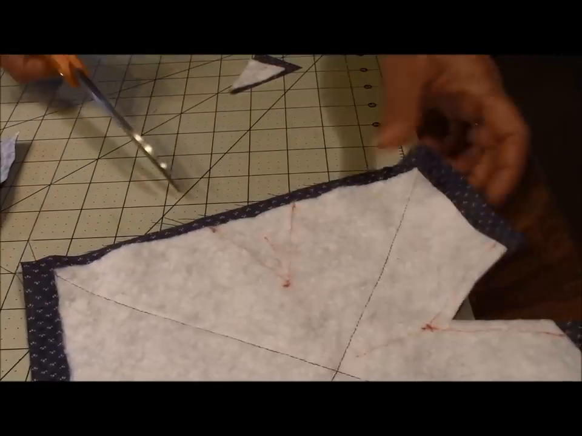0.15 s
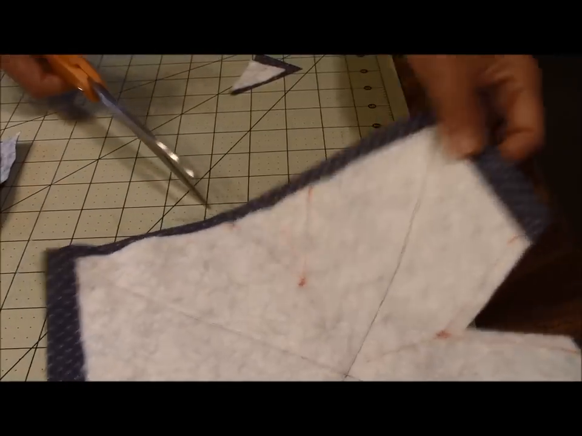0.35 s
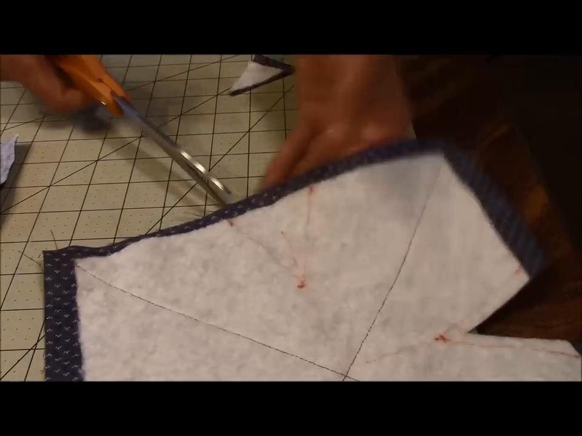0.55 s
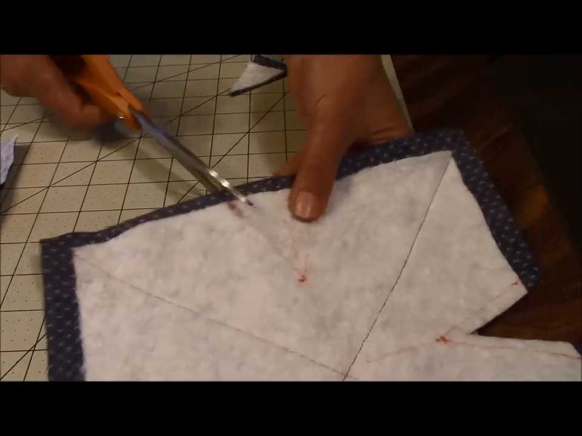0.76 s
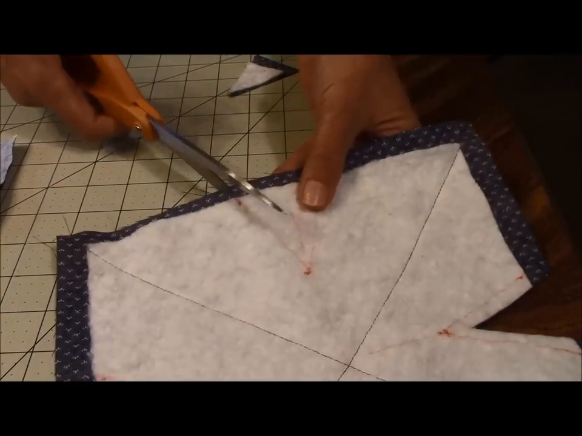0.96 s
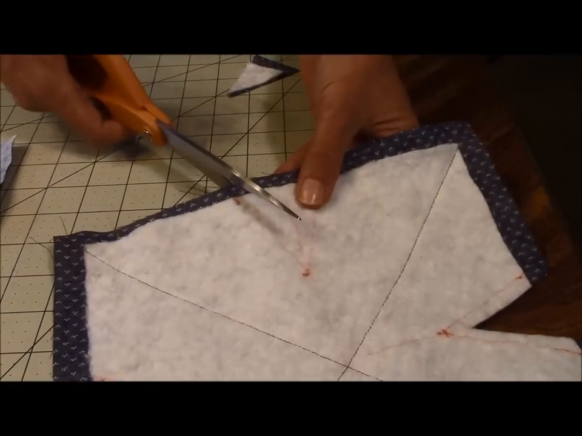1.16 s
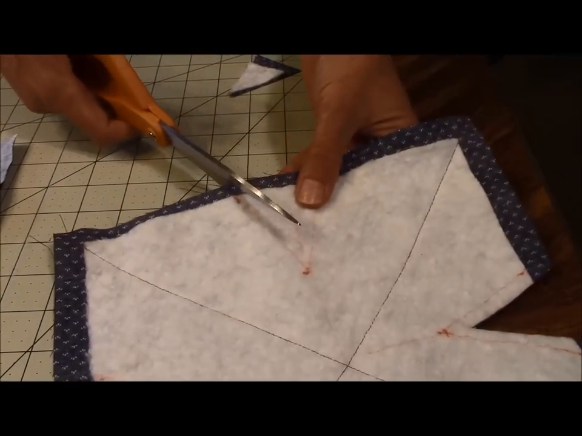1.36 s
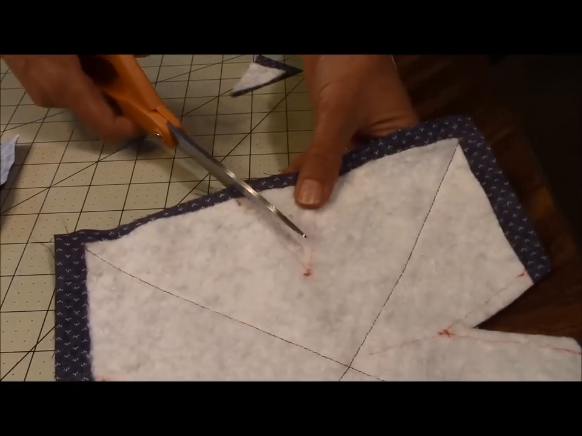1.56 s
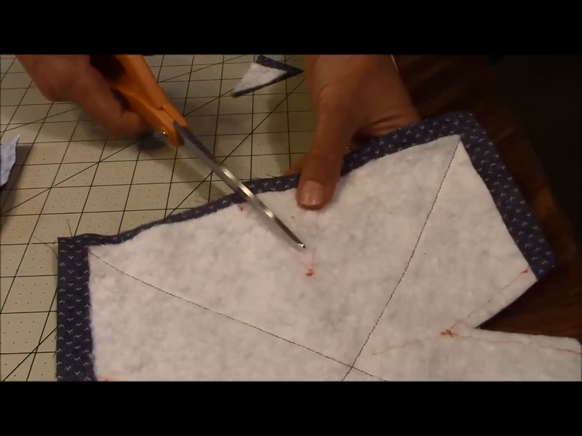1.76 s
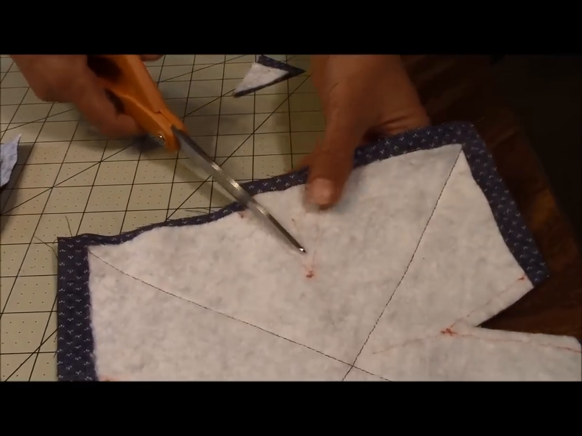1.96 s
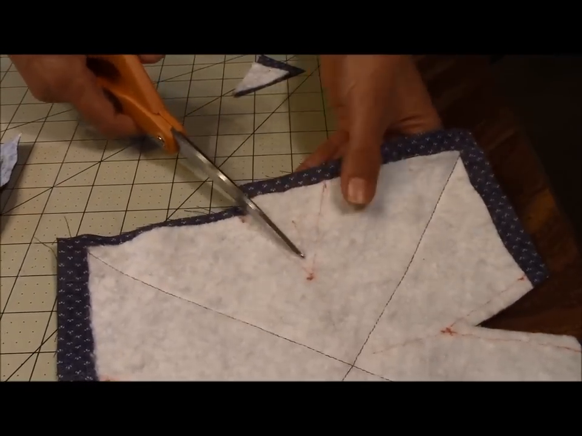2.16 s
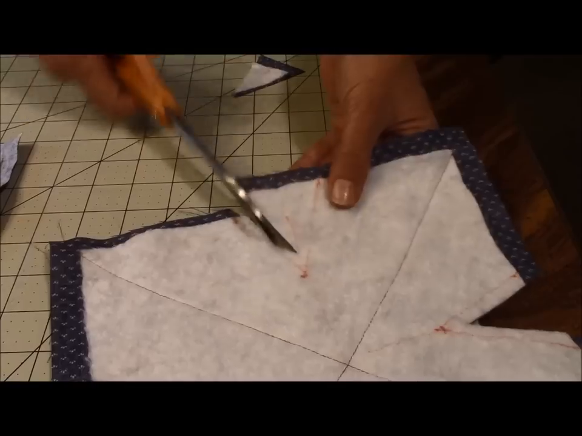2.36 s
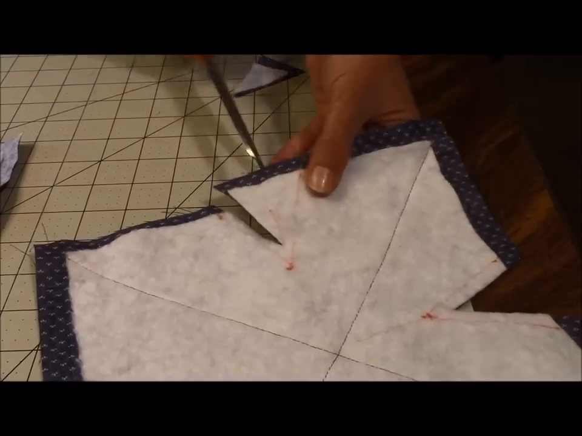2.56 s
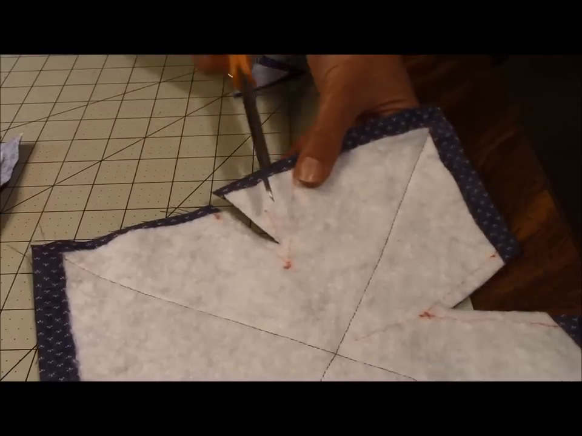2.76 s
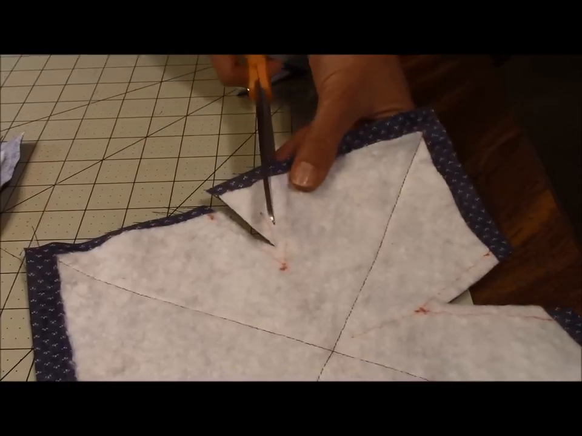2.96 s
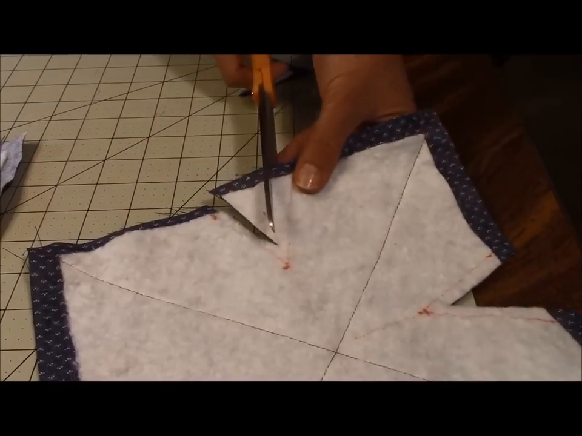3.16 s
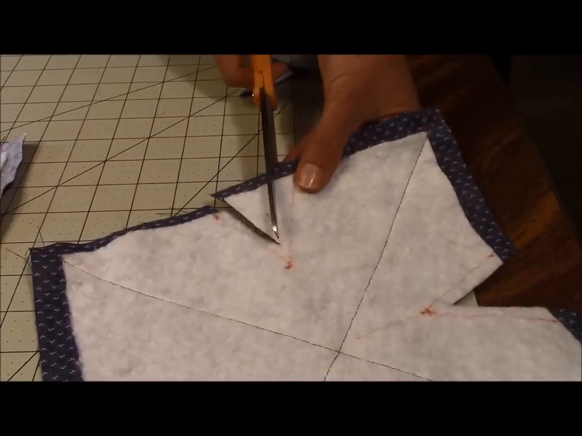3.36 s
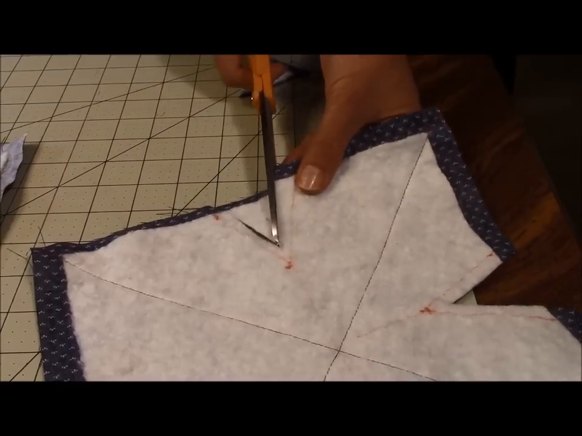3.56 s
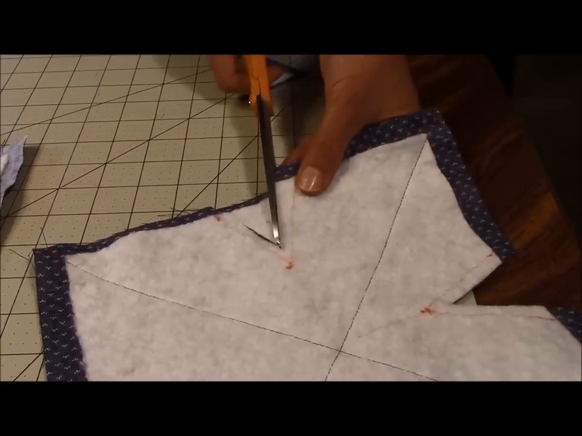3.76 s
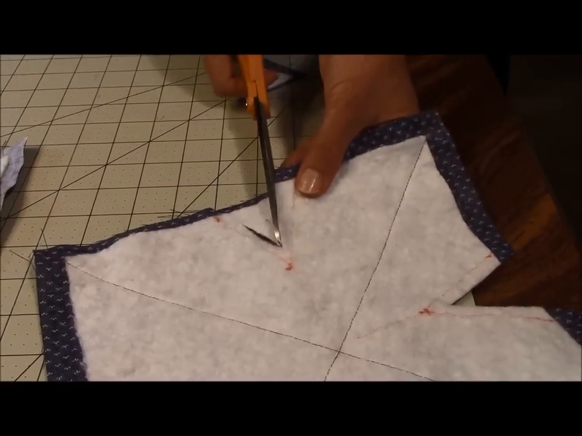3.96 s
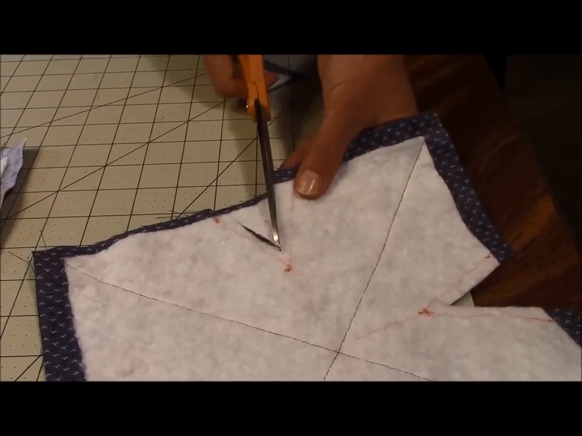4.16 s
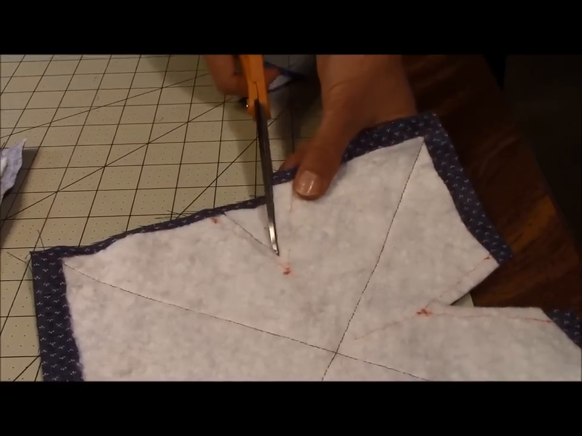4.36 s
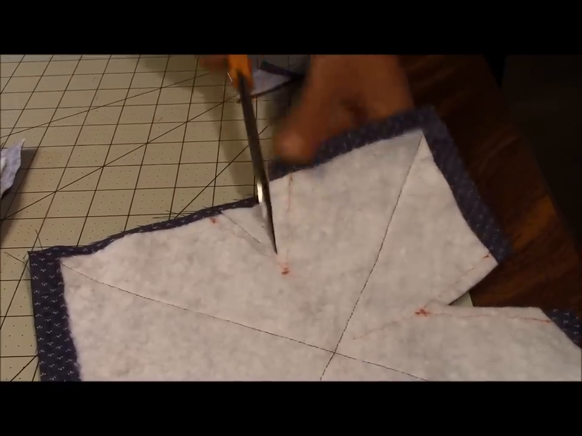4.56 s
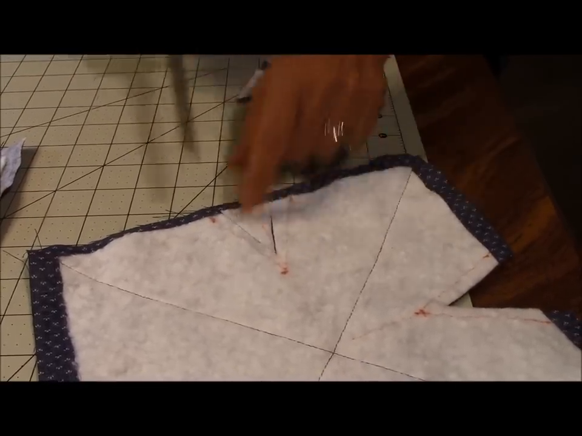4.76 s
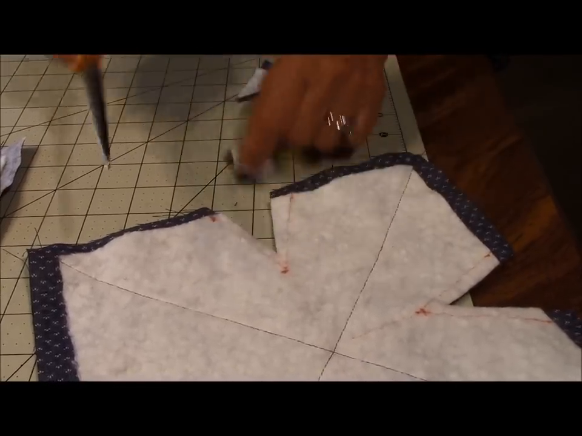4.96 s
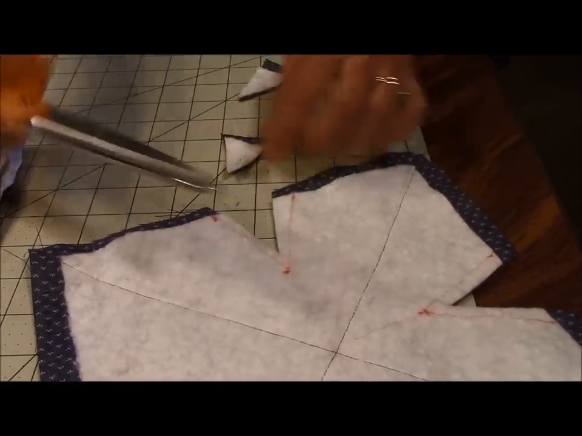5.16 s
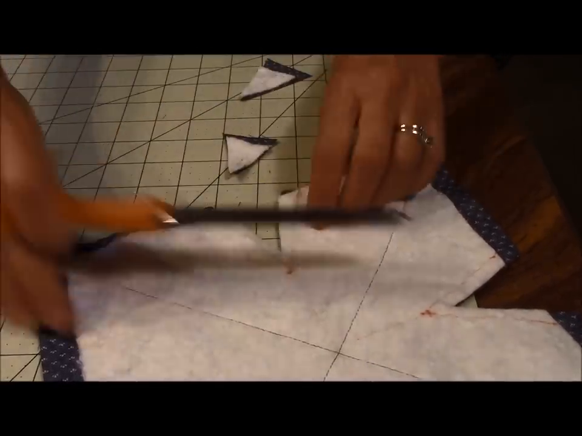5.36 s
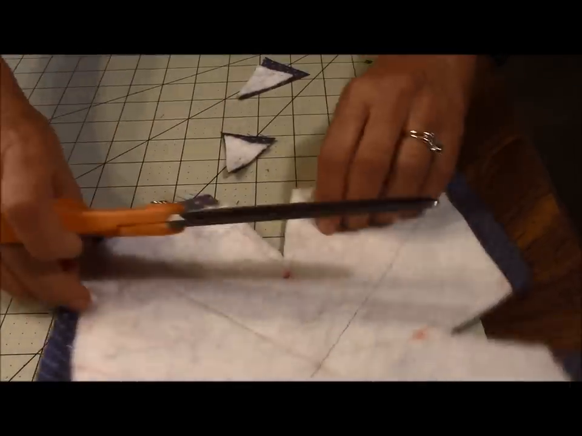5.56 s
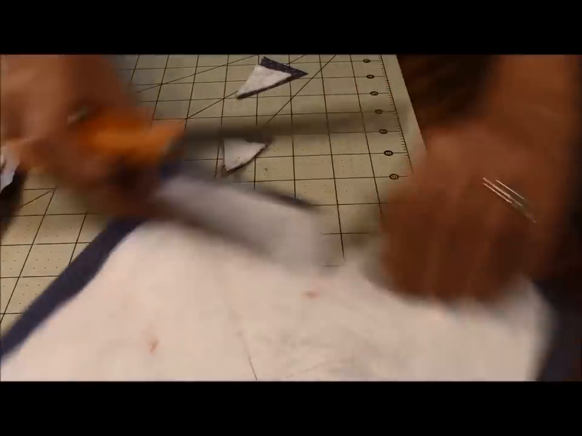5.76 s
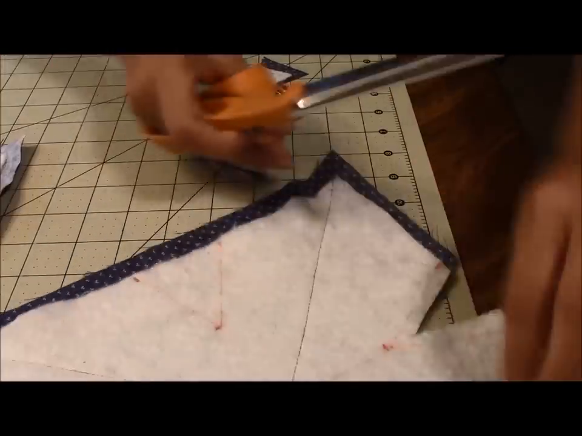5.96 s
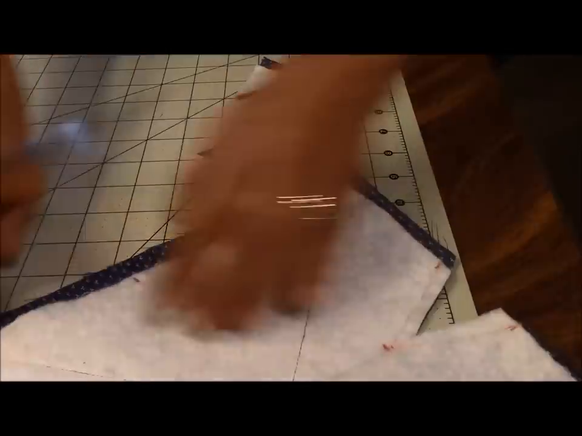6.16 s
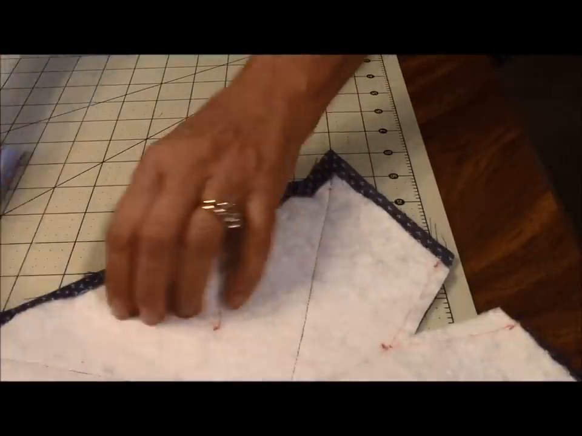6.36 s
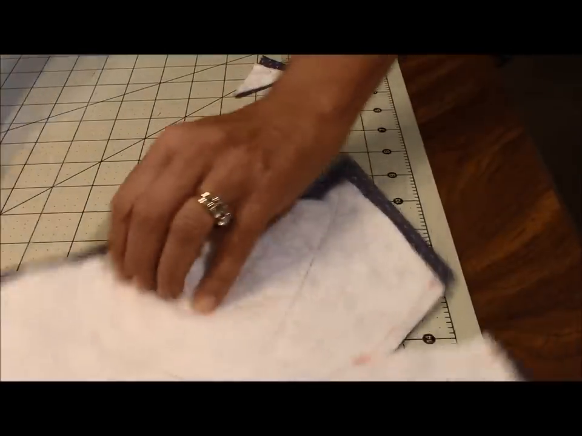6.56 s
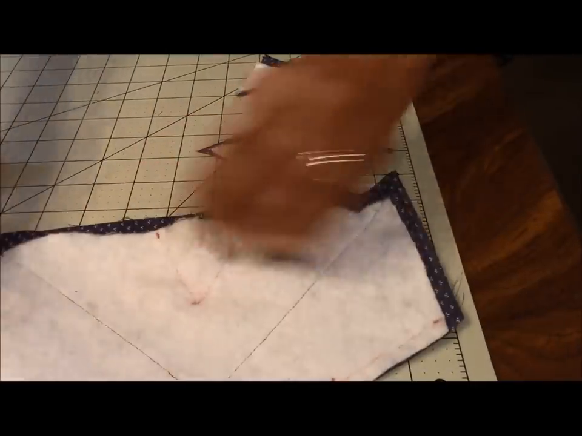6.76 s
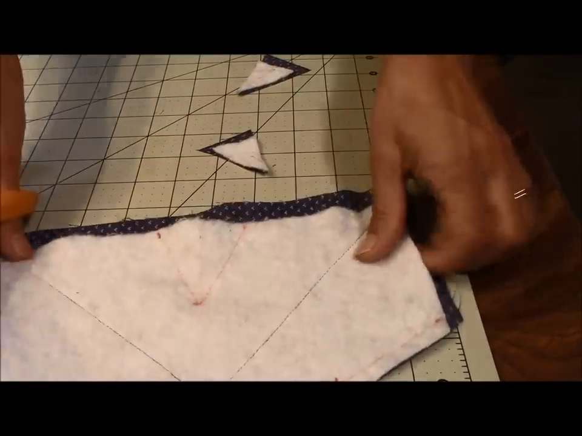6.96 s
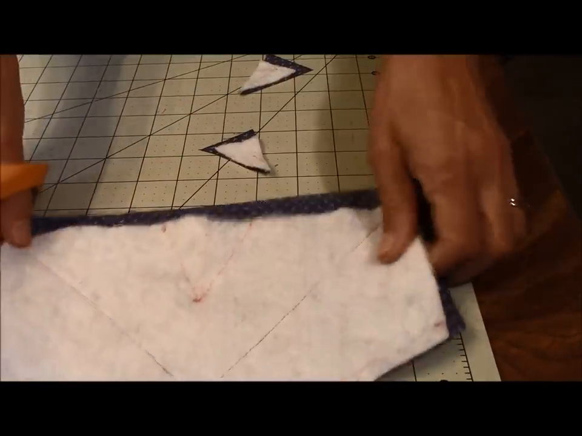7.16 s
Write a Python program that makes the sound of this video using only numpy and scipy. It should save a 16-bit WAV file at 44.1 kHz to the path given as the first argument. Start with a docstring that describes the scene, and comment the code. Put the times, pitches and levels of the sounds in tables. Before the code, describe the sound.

Scissors crunch through padded cotton in three gritty cuts, two ending in a snap, amid cloth rustles and light taps over a steady hum.

```python
"""Cloth rustles and slides over a mat amid light taps, above a steady mains hum and room noise.
From 1.5 s scissors chew through quilted cotton in three cuts; the first and third end in a snap.
The blades advance in short slips: torn-thread noise drives fibre, steel, handle and table resonances.
Gritty filtered noise makes the cloth slide over mat and fingers and the cuts and snaps fade away,
while short dying partials and knocks make the rings and scissors tap; sparse reflections add the room."""
import sys
import numpy as np
from scipy import signal
from scipy.fft import rfft, irfft
from scipy.io import wavfile
from scipy.ndimage import uniform_filter1d

SR = 44100
rng = np.random.default_rng(int(sys.argv[2]) if len(sys.argv) > 2 else 0)


def to_wav(s):
    """Save 16-bit WAV."""
    ch = np.atleast_2d(s).T  # columns
    pcm = np.round(np.clip(ch, -1, 1) * 32767)  # PCM
    wavfile.write(sys.argv[1], SR, pcm.astype(np.int16))


N = 317961

# Steady hum. Each row: multiple of the hum pitch, level in dB rms.
HUM_PARTIALS = [(1, -36), (2, -53), (3, -47.5), (5, -61)]
HUM_HZ = 120.0

# Colour of the room noise. Each row: frequency in Hz, relative density in dB per Hz.
AIR_COLOUR = [(22, -41), (40, -14.5), (60, -16.5), (100, -8), (160, 2.5), (250, -1), (330, -4), (358, 1),
              (390, -3.5), (600, -8.5), (1000, -12), (1400, -18.5), (2500, -25.5), (5000, -31), (8000, -35),
              (12000, -42.5), (16000, -48)]
AIR_DB = -45.5  # rms of the mid channel
# Stereo width of the room noise. Each row: frequency in Hz, side level under mid in dB.
AIR_SIDE_LEVEL = [(25, -10), (60, -12), (120, -40), (250, -16.5), (700, -13.5), (2400, -8.5), (6000, -8),
                  (9000, -15), (15000, -34)]

# Strokes of cloth over the mat, and the fading tails after the cuts and snaps. Each row: start in
# seconds, length in seconds, then the levels of fizz, scrape and table rumble in dB.
STROKES_AND_TAILS = [(0.08, 0.22, -65, -59, -47), (0.348, 0.16, -62.5, -60, -48),
                     (0.638, 0.14, -59.5, -47.5, -47), (2.184, 0.1, -58, -45, -37.5),
                     (2.381, 0.057, -48, -52, -50), (2.407, 0.098, -52, -60, -48),
                     (2.459, 0.17, -56.5, -46.5, -36.5), (2.65, 0.27, -65, -57, -45.5),
                     (3.089, 0.034, -57, -60, -58), (3.59, 0.075, -67, -58, -62),
                     (4.403, 0.12, -63, -58, -45), (4.625, 0.053, -62, -43.5, -41.5),
                     (4.737, .04, -58, -55, -49), (4.906, 0.22, -52, -50, -41.5),
                     (5.0, 0.068, -49, -46, -47), (5.295, 0.18, -54.5, -53, -45),
                     (5.386, 0.37, -55.5, -56.5, -50), (5.54, 0.066, -45.5, -51, -40.5),
                     (5.577, 0.42, -51.5, -49, -74), (5.834, .19, -51.5, -54, -60),
                     (6.306, 0.22, -51, -47, -54), (6.13, .07, -63, -70, -61), (6.423, 0.32, -52, -50, -66),
                     (6.6, .2, -53.5, -53.5, -57), (6.986, 0.048, -46.5, -41, -36),
                     (7.03, 0.24, -60.5, -63, -50.5), (.8, 0.23, -81, -63, -73),
                     (3.98, 0.036, -69, -62, -53)]
SLIDE_RISE, SLIDE_FALL = 0.34, 0.38  # shares of the length
# Faint handling throughout. One row: levels of fizz, scrape and rumble in dB, before their wander.
RUSTLE_LEVELS = [-73, -67, -53.5]
RUSTLE_WANDER_DB = 2
# Colour of the bright friction. Each row: frequency in Hz, relative density in dB per Hz.
FIZZ_COLOUR = [(4500, -5), (5800, -2.5), (7300, 1), (9000, -3.5), (11100, -8), (16000, -24)]
# Colour of the mid-range friction. Each row: frequency in Hz, relative density in dB per Hz.
SCRAPE_COLOUR = [(900, 7.5), (1400, 5.5), (2000, 6.5), (2500, 4), (3200, 6), (4400, -1.5), (6000, -42)]
# Short rubs with a clear colour. Each row: start in seconds, length in ms, centre in Hz, width in Hz,
# level in dB.
COLOURED_RUBS = [(.13, 58, 2120, 497, -51.5), (.14, 70, 2900, 500, -52), (.66, 110, 2600, 600, -66),
                 (.71, 38, 3600, 900, -62), (2.385, 46, 4770, 500, -54.5), (2.41, 39, 2150, 400, -54),
                 (2.54, 68, 3700, 900, -55), (2.72, 120, 3240, 400, -59), (5.312, 28, 3320, 900, -46.5),
                 (6.37, 77, 3070, 350, -49), (6.55, 48, 2030, 600, -51), (6.289, 39, 534, 300, -37),
                 (6.35, 60, 615, 300, -40), (6.999, 29, 1990, 500, -44), (7.03, 48, 7200, 900, -52)]

# Table resonances. Each row: frequency in Hz, width in Hz before any widening, relative level in dB.
TABLE_MODES = [(175, 60, -10), (280, 50, -4), (350, 50, 0), (450, 70, -4), (560, 90, -8)]
# Handle resonances. Each row: frequency in Hz before any pitch ratio, width in Hz before any widening,
# relative level in dB.
HANDLE_MODES = [(730, 141, 0.5), (839, 140, 0.5), (1068, 140, -10), (1485, 120, -13.5)]

# Single taps. Each row: start in seconds, tick level in dB, tick pitch in Hz, table knock peak in dB,
# crack in dB against the tick, t60 in ms.
SINGLE_TAPS = [(0.1546, -36, 2020, -42, -6, 12), (0.2394, -35, 1810, -28, -7, 10),
               (0.3381, -23.5, 1980, -14, -1.5, 11), (0.6546, -11.5, 2840, -29, -17, 14),
               (.6576, -19, 2700, -42, -15, 10), (.7068, -21, 2930, -48, -16, 10),
               (2.1122, -14, 820, -57, -15.5, 22), (2.4755, -38.5, 2040, -25, 3, 13),
               (2.5913, -40, 1610, -25, 4, 8), (2.715, -38.5, 3330, -28.5, 0, 11),
               (2.9009, -33.5, 3200, -37, -9, 13), (3.4748, -21, 8450, -18.5, -10, 8),
               (4.6446, -33, 2710, -48, -7.5, 15), (4.6575, -39, 1850, -39, -4, 11),
               (4.7308, -29.5, 3330, -38, -6, 6.9), (4.879, -46, 1560, -27.5, 2, 8.7),
               (5.3149, -28, 2800, -43, -7.5, 14), (5.462, -39, 2600, -47, -2.5, 8),
               (5.5753, -32, 1890, -40, -6, 8.9), (6.084, -29, 3850, -35, 2.5, 9),
               (6.2861, -18.5, 3120, -33, -7, 12.2), (6.3001, -33.5, 2040, -23.5, 9, 9.6),
               (6.744, -30, 2230, -45, -15, 11), (6.76, -30.5, 1850, -48, -9, 14),
               (6.786, -44, 3400, -44, -1.5, 6.2), (6.8493, -20.5, 4020, -38, -8, 5.1),
               (6.954, -36, 3300, -42, -12, 12), (6.969, -37, 2010, -40, -2, 9),
               (6.9779, -29.5, 1890, -23, 0, 15), (6.9862, -20, 3300, -19.5, 0, 7),
               (7.1907, -34, 2250, -50, -9, 8.2)]
# Close partials of a tick. Each row: ratio to the tick pitch, level in dB.
TICK_PARTIALS = [(.86, -12), (1, -2), (1.2, -16)]
# Colour of the crack. Each row: frequency in Hz, relative density in dB per Hz.
CRACK_COLOUR = [(800, -11.5), (2000, 11.5), (7000, 0.5), (10000, -11.5), (16000, -35)]
TICK_RISE_S = .0004
KNOCK_WIDEN = 2.6  # factor on the resonance widths

# The scissors snap shut. Each row: start in seconds, level in dB, pitch of the handle clack in Hz,
# clack in dB against the level, table knock in dB against the level.
SCISSOR_SNAPS = [(2.1892, -9.5, 815, 9, 2.7), (4.395, -13, 2960, 5, 1)]
# Steps of every snap: the tips meet and bounce twice. Each row: delay in ms, tick in dB against the
# snap, pitch in Hz, knock in dB against the knock of the snap, crack in dB against the tick.
SNAP_STEPS = [(0, 1, 5050, -6, -2), (4.5, -14, 1830, -13.5, -11), (7.5, -11, 2090, 1, -16)]
CLACK_MS, CLACK_KNOCK_DB, CLACK_CRACK_DB = 1.4, -2, -15.5  # the same measures for the handle clack
SNAP_T60_MS = 7.0

# Blade slips. Each row: start in seconds, length in ms, fibre hiss in dB, thrust into the table in dB.
BLADE_SLIPS = [(1.506, 6, -46, -66), (1.532, 32, -42.5, -39), (1.567, 14.3, -37.5, -32.5),
               (1.598, 14.4, -39.5, -33), (1.627, 14.4, -41.5, -31), (1.674, 9.7, -38, -27.5),
               (1.699, 11.2, -38, -35), (1.74, 19.5, -36, -29), (1.778, 26, -37.5, -34),
               (1.81, 12.5, -41, -39), (1.885, 18.3, -35.5, -27), (1.905, 8.9, -42, -35),
               (1.917, 14, -39, -30.5), (1.945, 8.4, -36, -41), (1.955, 28.6, -39, -30.5),
               (2.011, 7.6, -40, -36), (2.059, 8.6, -29.5, -23.5), (2.103, 14.5, -28, -25),
               (2.13, 6.8, -34.5, -39), (2.143, 11.6, -29, -23), (2.161, 9.5, -29.5, -35),
               (2.184, 9.6, -24.5, -16), (3.175, 5.7, -43.5, -56), (3.197, 33, -42.5, -46.5),
               (3.248, 19, -41.5, -44), (3.287, 24, -42.5, -36), (3.308, 19, -44, -45),
               (3.359, 8, -44, -48), (3.395, 9.1, -39.5, -37), (3.408, 16, -38.5, -40),
               (3.428, 6.2, -43, -59), (3.456, 17.5, -39, -38), (3.468, 29, -39, -31),
               (3.514, 17, -38.5, -31), (3.552, 31, -37.5, -32), (3.59, 5.9, -46, -36),
               (4.166, 5, -50, -33), (4.203, 16, -43, -33), (4.263, 16, -49, -52), (4.32, 17, -33.5, -25.5),
               (4.338, 19, -32.5, -29), (4.361, 19.6, -30, -27), (4.387, 9.5, -33, -29)]
# Squeezes of the handles. Each row: start in seconds, end in seconds, blade ring over fibre hiss in dB
# at the start and at the end, handle shake in dB over the mean of hiss and thrust, handle pitch ratio,
# ring level of the steady rasp in dB, pitch rise of the hiss as a share.
HANDLE_SQUEEZES = [(1.483, 1.851, -30, 0, -6, 1.07, -55, 0.096),
                   (1.873, 2.035, -1.5, 1.5, -1, 0.99, -49.5, -0.019),
                   (2.033, 2.205, -6, -4.5, -5.5, 1.13, -53.5, -0.024),
                   (3.17, 3.392, -6, -13, -5, 0.94, -57, 0.1),
                   (3.373, 3.616, -10, 13, -5.5, 1.035, -50, -0.024),
                   (4.144, 4.404, 8, -2.5, -5, 0.92, -54, 0.026)]
# The bite point moves, so each squeeze rings the cutting blades differently.
# Resonances of the fibre hiss. Each row: frequency in Hz before the pitch rise, width in Hz before any
# widening, relative level in dB for each of the six squeezes.
FIBRE_MODES = [(7000, 1060, -0.5, 3.5, -7, -2, -2, 5), (7900, 450, 1.5, -5, 1.5, -16, -15, 3),
               (8670, 550, -2.5, 3, -7, 6, -2, 2), (9700, 840, -10, 1, -2, -4, -2, 2.5),
               (10830, 1000, -12, -9, -16, -7, -12, -3.5), (11940, 860, -12.5, -16, -16, -14, -6, -7),
               (14600, 1900, -17, -15, -15, -16, -9, -9)]
# Resonances of the blade ring. Each row: frequency in Hz before the pitch rise, width in Hz before any
# widening, relative level in dB for each of the six squeezes.
BLADE_MODES = [(1995, 170, 1, -1, -12, -5, -16, -2), (2575, 290, -4.5, 1.5, -7, 4, 4.5, 10.5),
               (3023, 104, -10, -6, -12, 5, 3.5, 5), (3330, 480, -5, 1, -2, 3, -1.5, 10),
               (4090, 200, -3, 1, -8, -1, -2.5, -26), (4910, 510, -30, -1, -0.5, 12, 5, 12.5)]
RING_CLIMB, HANDLE_CLIMB = 0.038, 0.061  # rise over one squeeze: share of pitch, step in pitch ratio
HISS_RISE = .4  # share of the slip
RASP_HISS_DB, RASP_HANDLES_DB = -6, 1.5  # against the ring of the rasp

# Decay of the reflections. Each row: frequency in Hz, t60 in seconds.
ROOM_T60 = [(200, 0.62), (500, 0.15), (1500, 0.16), (4000, 0.1), (12000, 0.062)]
# Stereo width of the reflections. Each row: frequency in Hz, side level under mid in dB.
ROOM_SIDE_LEVEL = [(100, -42), (300, -42), (1000, -20), (4000, -10.5), (12000, -11)]
LOW_CUT_HZ, ROOM_CUT_HZ = 102, 650  # the table's thud stays near and barely reaches the walls
ROOM_DB = -9.5
EDGE_HZ = 15900


def amp(db):
    """Turns dB into a linear factor."""
    return 10 ** (np.asarray(db) / 20)


def unit_rms(x):
    """Scales x to rms 1."""
    return x / np.sqrt(np.mean(x ** 2) + 1e-20)


def read(points, hz):
    """Reads a curve of frequency points, running straight between them on a log frequency scale."""
    f, value = np.transpose(points)
    return np.interp(np.log(hz + 1), np.log(f + 1), value)


def hum():
    """Mains hum: steady sines at whole multiples of one pitch, each with a random phase."""
    turn = 2 * np.pi * HUM_HZ * np.arange(N) / SR
    return sum(np.sqrt(2) * amp(db) * np.sin(round(k) * turn + 2 * np.pi * rng.random())
               for k, db in HUM_PARTIALS)


def air():
    """Room noise: coloured mid and side noise, with less side than mid in every band."""
    a, b = rng.standard_normal((2, N))
    hz = np.fft.rfftfreq(N, 1 / SR)
    colour_db = read(AIR_COLOUR, hz)
    mid = irfft(rfft(a) * amp(colour_db), N)
    side = irfft(rfft(b) * amp(colour_db + read(AIR_SIDE_LEVEL, hz)), N)
    return amp(AIR_DB) * np.array([mid + side, mid - side]) / np.std(mid)


def add(mix, s, sound):
    """Lays a sound into the mix at s seconds."""
    part = mix[round(s * SR):][:len(sound)]
    part += sound[:len(part)]


def shaped(x, colour):
    """Colours x by a spectrum in dB, to rms 1."""
    hz = np.fft.rfftfreq(len(x), 1 / SR)
    return unit_rms(irfft(rfft(x) * amp(read(colour, hz)), len(x)))


def smooth_noise(size):
    """Slow random wander at rms 1: noise averaged twice over size samples."""
    once = uniform_filter1d(rng.standard_normal(N), size)
    return unit_rms(uniform_filter1d(once, size))


def ring(hz, width):
    """Soft-starting dying sine of energy 1: a resonance with steep skirts."""
    t = np.arange(2048) / SR
    wave = t * np.exp(-1.5 * np.pi * width * t) * np.sin(2 * np.pi * hz * t)
    return wave / np.linalg.norm(wave)


def body(modes, widen):
    """All modes of one object rung at once, with alternating signs."""
    return sum((-1) ** k * amp(np.mean(db)) * ring(hz, widen * width)
               for k, (hz, width, *db) in enumerate(modes))


def grit(grain_db, ms):
    """Noise whose level flickers from one tearing or rubbing thread to the next."""
    size = max(round(ms * SR / 1000), 1)
    flicker = unit_rms(uniform_filter1d(rng.standard_normal(N), size))
    return unit_rms(amp(grain_db * flicker) * rng.standard_normal(N))


def patchy(x, patch_db):
    """Random patches of colour drift through x as the weave catches unevenly."""
    z = signal.stft(x, nperseg=512)[2]
    across_pitch = uniform_filter1d(rng.standard_normal(z.shape), 9, 0)
    patches = unit_rms(uniform_filter1d(across_pitch, 9, 1))
    return unit_rms(signal.istft(z * amp(patch_db * patches), nperseg=512)[1][:N])


def swells(s, length, db, rise, fall):
    """Rise, hold and fall for each row; overlapping swells add their power."""
    u = (np.arange(N) / SR - np.array(s)[:, None]) / np.array(length)[:, None]
    shape = np.clip(np.minimum(u / rise, (1 - u) / fall), 0, 1) ** 0.99
    return np.sqrt(amp(db) ** 2 @ shape ** 2)


def rubs():
    """Short friction: faded bursts of fibre noise, each driving one resonance."""
    out = np.zeros(N)
    fibres = grit(1.4, 1.7)
    for s, ms, hz, width, db in COLOURED_RUBS:
        burst = unit_rms(fibres[round(s * SR):][:round(ms * SR / 1000)])
        faded = burst * signal.windows.tukey(len(burst), .4)
        add(out, s, amp(db) * signal.oaconvolve(faded, ring(hz, width)))
    return out


def slides_and_tails():
    """Gritty noise in three registers for cloth strokes, fading tails and a faint rustle, with short rubs."""
    fizz = patchy(shaped(grit(1.4, 3.1), FIZZ_COLOUR), patch_db=1.5)
    scrape = patchy(shaped(grit(2.8, 4.), SCRAPE_COLOUR), patch_db=1.8)
    wood = body(TABLE_MODES, widen=1.85) + amp(-4.0) * body(HANDLE_MODES, widen=1.6)
    rumble = unit_rms(signal.oaconvolve(grit(3.9, 10.0), wood)[:N])
    s, length, *levels = np.transpose(STROKES_AND_TAILS)
    wander = amp(RUSTLE_WANDER_DB * smooth_noise(1500))
    out = rubs()
    for layer, db, faint_db in zip([fizz, scrape, rumble], levels, RUSTLE_LEVELS):
        swell = swells(s, length, db, SLIDE_RISE, SLIDE_FALL)
        out += layer * np.hypot(swell, amp(faint_db) * wander)
    return out


def tap(s, tick_db, hz, knock_db, crack_db, t60_ms):
    """A short tick of three close partials, a wide crack and, a moment later, a knock into table and handles."""
    t = np.arange(2048) / SR
    fall = amp(-60000 * t / t60_ms) * np.minimum(t / TICK_RISE_S, 1)
    partials = sum(amp(db) * np.sin(2 * np.pi * hz * ratio * t) for ratio, db in TICK_PARTIALS)
    crack = amp(crack_db) * shaped(rng.standard_normal(len(t)), CRACK_COLOUR)
    tick = fall * (partials + crack)
    knock = np.zeros(len(t))
    for f, width, db in TABLE_MODES + HANDLE_MODES:
        tilt_db = -14.0 * abs(np.log2(f / 400))  # weaker with each octave away from 400 Hz
        knock += amp(db + rng.standard_normal() + tilt_db) * ring(f, KNOCK_WIDEN * width)
    late_knock = np.roll(knock, 10) / abs(knock).max()
    return s, amp(tick_db) * tick - amp(knock_db) * late_knock


def taps():
    """Single taps, and snaps in which tips, handles and bounces follow within a few ms."""
    out = np.zeros(N)
    for row in SINGLE_TAPS:
        add(out, *tap(*row))
    for s, db, clack_hz, clack_db, thud_db in SCISSOR_SNAPS:
        clack = (CLACK_MS, clack_db, clack_hz, CLACK_KNOCK_DB, CLACK_CRACK_DB)
        for ms, tick_db, hz, knock_db, crack_db in SNAP_STEPS + [clack]:
            add(out, *tap(s + ms / 1000, db + tick_db, hz, db + thud_db + knock_db, crack_db, SNAP_T60_MS))
    return out


def bite():
    """The squeeze of each slip, and how far (0-1) that squeeze has closed."""
    s = np.transpose(BLADE_SLIPS)[0]
    start, end = np.transpose(HANDLE_SQUEEZES)[:2]
    squeeze = np.searchsorted(start, s) - 1
    return squeeze, (s - start[squeeze]) / (end - start)[squeeze]


def slips(level_db, pitch, modes, spread_db, grain_db, rise):
    """Each slip drives the modes with torn-thread noise, balanced by its squeeze and a little by chance."""
    hz, width, *db = np.transpose(modes)
    balance_db = np.array(db)[bite()[0] % len(db)]  # objects with one level column keep it throughout
    chance_db = spread_db * rng.standard_normal((len(BLADE_SLIPS), len(modes)))
    share = amp(balance_db + chance_db)
    share = share / np.linalg.norm(share, axis=1, keepdims=True)
    drive, out = grit(grain_db, 1.3), np.zeros(N)
    for (s, ms, *_), gain, ratio, weights in zip(BLADE_SLIPS, amp(level_db), pitch, share):
        u = np.linspace(0, 1, round(ms * SR / 1000) + 40)
        force = gain * np.minimum(u / rise, 1) * np.minimum((1 - u) / 0.25, 1)
        for k, weight in enumerate(weights):
            threads = drive[round(s * SR) + 977 * k:][:len(u)]  # other threads for each mode
            add(out, s, signal.fftconvolve(weight * force * threads, ring(ratio * hz[k], width[k])))
    return out


def rasp():
    """Steady grind of the squeezes: separate gritty noises through the fibre, blade and handle modes."""
    start, end, _, _, _, _, rasp_db, _ = np.transpose(HANDLE_SQUEEZES)
    out = np.zeros(N)
    for modes, db in ((FIBRE_MODES, RASP_HISS_DB), (BLADE_MODES, 0), (HANDLE_MODES, RASP_HANDLES_DB)):
        out += amp(db) * unit_rms(signal.oaconvolve(grit(4.0, 11.0), body(modes, widen=1.2))[:N])
    return out * swells(start, end - start, rasp_db, rise=0.14, fall=0.02)


def cuts():
    """Fibre hiss and blade ring in slips over a rasp; handles and table shake along."""
    squeeze, closed = bite()
    _, _, first_db, last_db, shake_db, ratio, _, climb = np.transpose(HANDLE_SQUEEZES)
    hiss_db, thrust_db = np.transpose(BLADE_SLIPS)[2:]
    ring_db = hiss_db + first_db[squeeze] + (last_db - first_db)[squeeze] * closed
    handle_db = (hiss_db + thrust_db) / 2 + shake_db[squeeze]
    hiss_pitch = 1 + climb[squeeze] * (closed - .5)
    steel_pitch = 1 + RING_CLIMB * (closed - .5)
    handle_pitch = ratio[squeeze] + HANDLE_CLIMB * (closed - .5)
    hiss = slips(hiss_db, hiss_pitch, FIBRE_MODES, spread_db=0.5, grain_db=2.0, rise=HISS_RISE)
    steel = slips(ring_db, steel_pitch, BLADE_MODES, spread_db=2.5, grain_db=0.0, rise=0.12)
    table = slips(thrust_db, np.ones(len(closed)), TABLE_MODES, spread_db=0.0, grain_db=4.0, rise=0.42)
    handles = slips(handle_db, handle_pitch, HANDLE_MODES, spread_db=3.2, grain_db=9.5, rise=0.42)
    return hiss + steel + table + handles + rasp()


def room(x):
    """Sparse reflections of random sign, each band dying at its own speed; the ears differ most in the treble."""
    size = SR // 2
    hits = np.zeros((2, size))
    at = np.arange(100, size - 20, 20) + rng.integers(0, 20, (2, (size - 101) // 20))
    np.put_along_axis(hits, at, rng.choice([-1., 1.], at.shape), 1)
    hz, t, z = signal.stft(hits, SR, nperseg=256)
    z = z * amp(-60 * t / read(ROOM_T60, hz)[:, None])
    side_gain = amp(read(ROOM_SIDE_LEVEL, hz))[:, None]
    mid, side = signal.istft([z[0], z[1] * side_gain], SR, nperseg=256)[1]
    tail = np.array([mid + side, mid - side]) / np.linalg.norm(mid)
    return signal.fftconvolve(x[None], tail, axes=1)[:, :N]


def low_cut(x, order, hz):
    """Thins the bass below hz."""
    return signal.sosfilt(signal.butter(order, hz, "high", fs=SR, output="sos"), x)


def scene():
    """Close sounds and their reflections over hum and room noise."""
    # a low cut near 100 Hz, as at a microphone, thins the bass of the close sounds
    near = low_cut(slides_and_tails() + taps() + cuts(), 2, LOW_CUT_HZ)
    reflections = amp(ROOM_DB) * room(low_cut(near, 1, ROOM_CUT_HZ))
    return near + reflections + hum() + air()


def record(dry):
    """The band limit: a steep low-pass takes off the top of the treble."""
    lowpass = signal.firwin(1023, EDGE_HZ, window=("kaiser", 11), fs=SR)
    return signal.oaconvolve(dry, lowpass[None], "same")


dry = scene()
out = record(dry)
to_wav(out)
```